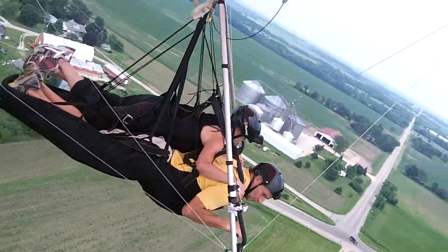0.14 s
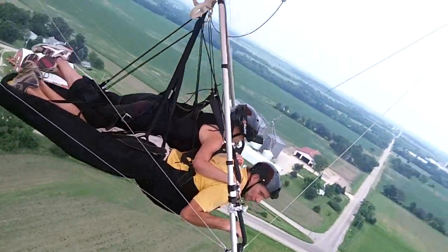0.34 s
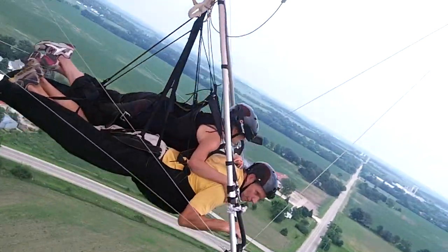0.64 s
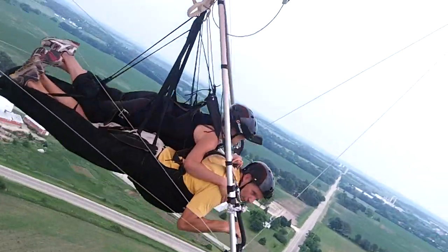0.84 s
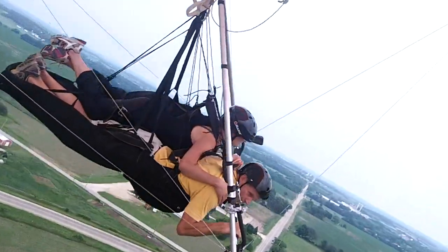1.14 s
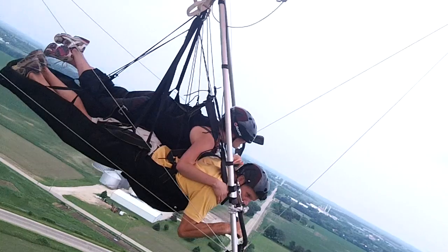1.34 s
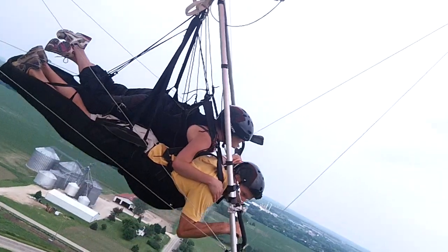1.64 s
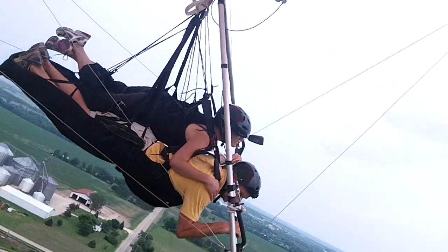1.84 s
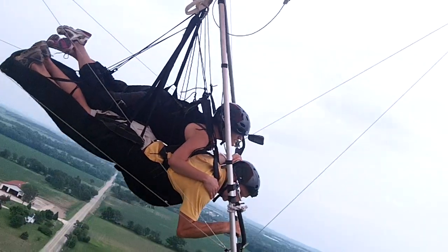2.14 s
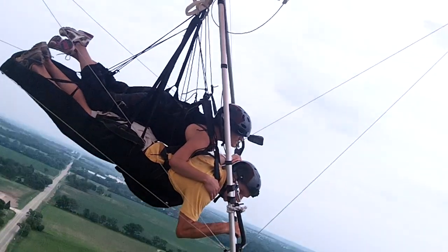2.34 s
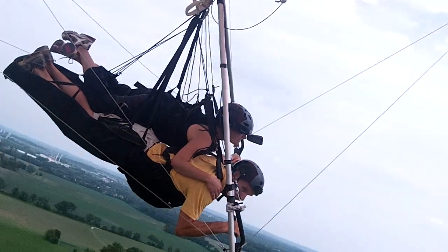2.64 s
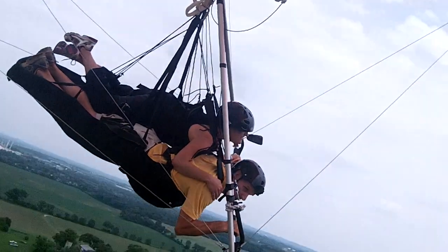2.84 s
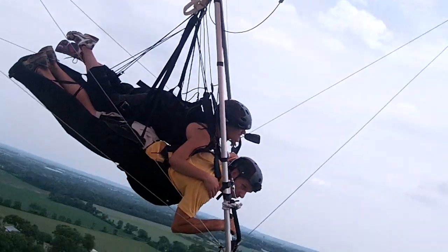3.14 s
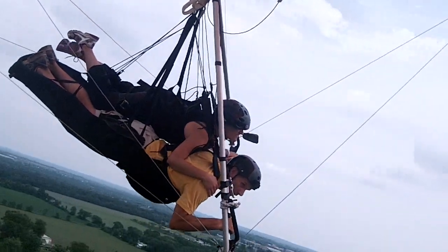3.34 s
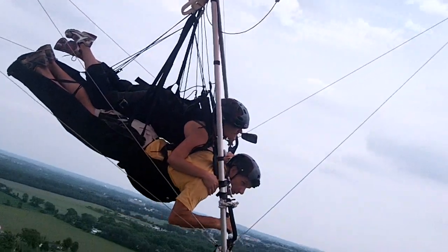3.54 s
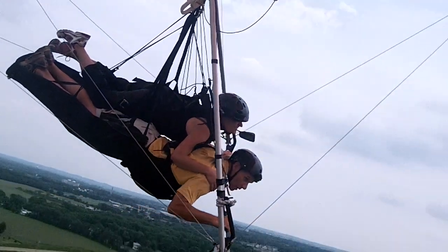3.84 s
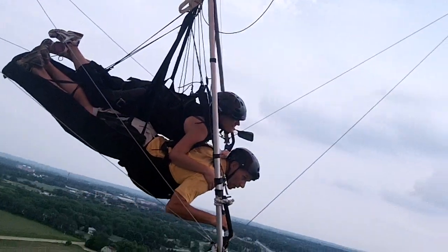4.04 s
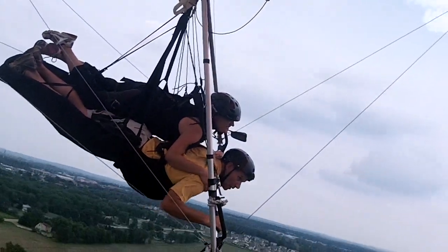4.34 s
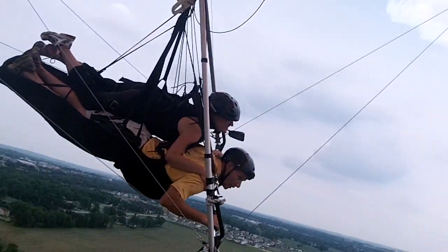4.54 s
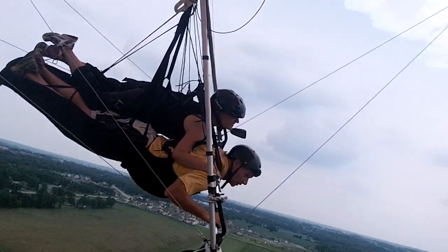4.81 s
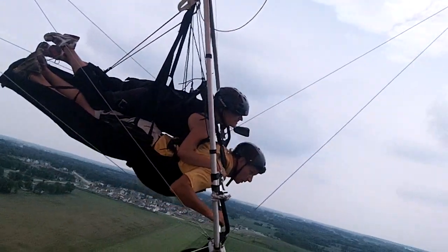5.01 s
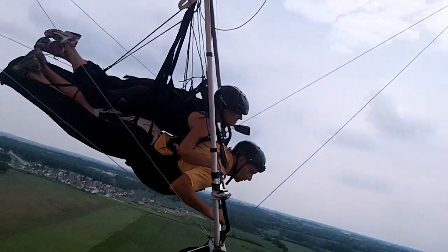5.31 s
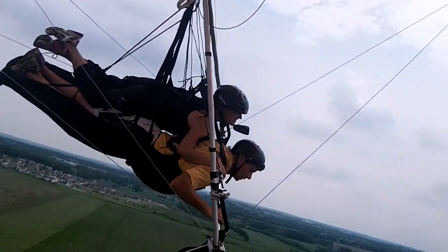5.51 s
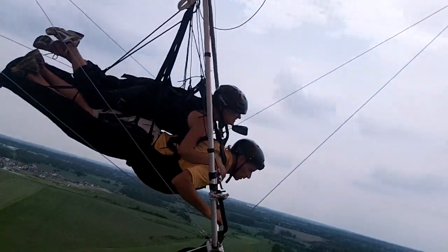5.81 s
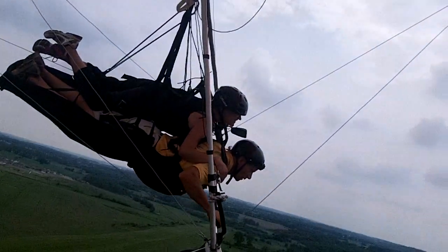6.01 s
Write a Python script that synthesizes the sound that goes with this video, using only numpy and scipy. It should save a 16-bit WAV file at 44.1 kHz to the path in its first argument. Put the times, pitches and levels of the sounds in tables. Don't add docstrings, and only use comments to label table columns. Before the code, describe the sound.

Continuous close wind roar high in the air, gusting unevenly, its hiss fading into deep rumbling thumps and ticks, then growing airy again.

```python
import sys
import numpy as np
from scipy import signal
from scipy.fft import rfft, irfft, next_fast_len
from scipy.io import wavfile
from scipy.ndimage import uniform_filter1d, map_coordinates

SR = 44100
rng = np.random.default_rng(int(sys.argv[2]) if len(sys.argv) > 2 else 0)


def transcribe(u):
    v = np.clip(np.atleast_2d(u).T, -1, 1)
    q = np.round(v * 32767).astype(np.int16)
    wavfile.write(sys.argv[1], SR, q)


def elevation(decibels):
    levels = np.asarray(decibels, float)
    return 10 ** (levels / 20)


N = 272097
TIME = np.arange(N) / SR


def unit(x):
    return x / np.sqrt(np.mean(x ** 2))


def noise():
    return rng.standard_normal(N)


def colour(x, points):
    size = next_fast_len(N)
    hz, db = np.transpose(points)
    bins_hz = np.arange(size // 2 + 1) * SR / size
    shape_db = np.interp(np.log(bins_hz + 1), np.log(hz), db, -120, -120)
    return unit(irfft(rfft(x, size) * elevation(shape_db), size)[:N])


def walk(rate):
    levels = rng.standard_normal(N // 32)
    return unit(map_coordinates(levels, [TIME * rate], order=3))


def evened(x, share, size):
    power = uniform_filter1d(x ** 2, size=size)
    return unit(x / (power + 0.06) ** (share / 2))


def curves(table):
    s, *columns = np.transpose(table)
    return [np.interp(TIME, s, c) for c in columns]


def bumps(s, half_s, db):
    coarse = TIME[::32]
    bells = np.exp(-((coarse - s[:, None]) / half_s[:, None]) ** 2)
    return np.interp(TIME, coarse, db @ bells)


# [t/s, strength level/dB, slowness level/dB]
LARGE_EDDIES = [(0, -29, 1.5), (.8, -29.5, -5), (1.2, -34, -5), (1.55, -30.5, -1.5), (1.7, -26, -4),
                (2.1, -21, -5), (2.5, -27.5, -3), (2.9, -24, -3), (3.5, -25, 0), (4.2, -25, -4),
                (4.8, -25.5, -0.5), (5.3, -31.5, 6.5), (5.7, -30, 3.5), (6.17, -29.5, 8)]
# [f/Hz, level/dB]
HEAVE_SPECTRUM = [(8, -29.5), (18, -6.5), (32, -3.5), (44, -6), (58, -19)]
# [f/Hz, level/dB]
SWING_SPECTRUM = [(36, -17), (47, -2.5), (60, 2), (85, -7), (110, -24.5)]
# [f/Hz, level/dB]
FLAP_SPECTRUM = [(70, -15.5), (92, 2), (120, -2.5), (160, -6.5), (220, -14), (320, -23.5), (500, -27.5)]


def buffet():
    strength_db, slow_db = curves(LARGE_EDDIES)
    heave_db = strength_db + slow_db + 0.5 + surge_db(30)
    swing_db = strength_db + surge_db(60)
    flap_db = -30 + 0.067 * (strength_db + 29) - 0.11 * slow_db + surge_db(120)
    heave = evened(colour(noise(), HEAVE_SPECTRUM), share=0.56, size=3200)
    swings = evened(colour(noise(), SWING_SPECTRUM), share=1.0, size=2400)
    flaps = evened(colour(noise(), FLAP_SPECTRUM), share=0.3, size=1800)
    steady = elevation(heave_db) * heave + elevation(swing_db) * swings + elevation(flap_db) * flaps
    strong, reach = thumps(hz=53.3, turns=0.36, peak_db=-9.5, slope=0.68)
    return (1 - 0.39 * reach) * steady + strong


# [t/s, peak level/dB]
TICKS = [(1.75, -52), (1.7916, -50.5), (1.823, -56), (1.8881, -53.5), (1.933, -52.5), (2.063, -57),
         (2.088, -57), (2.135, -50.5), (2.2695, -58), (2.31, -57), (2.5643, -57), (2.657, -53),
         (2.7373, -56), (2.845, -57), (2.88, -51), (2.9198, -54), (3.053, -56), (3.1773, -64), (3.256, -52),
         (3.341, -54.5), (3.5114, -50), (3.595, -55.5), (3.7286, -52), (3.8502, -52), (3.8843, -51.5),
         (3.914, -57), (4.2834, -49.5), (4.4692, -54), (4.9474, -60), (5.3527, -58)]


def thumps(hz, turns, peak_db, slope):
    s, db = np.transpose(TICKS)
    chance = rng.standard_normal((len(s), 2))
    lag = TIME - s[:, None] - .003
    pitch = hz * (1 + 0.22 * chance[:, :1])
    reach = np.exp(-(lag * pitch / turns) ** 2)
    push_or_pull = np.sign(chance[:, 1])
    depth = push_or_pull * elevation(peak_db + slope * (db - db.max()))
    swings = depth @ (reach * np.cos(2 * np.pi * pitch * lag))
    return swings, reach.max(axis=0)


# [t/s, half length/s, level/dB, swing
# rate f/Hz]
SURGES = [(0.01, 0.077, -10, 30), (0.04, 0.036, -1, 60), (0.249, 0.04, -11, 60), (0.684, 0.027, -9, 115),
          (0.906, 0.034, 8.1, 60), (1.347, 0.04, 1, 30), (1.576, 0.053, -14, 60), (1.97, 0.04, 3, 30),
          (2.045, 0.036, 5.1, 115), (2.27, 0.15, -4.5, 60), (2.754, 0.08, -7.1, 30), (2.768, 0.058, 7, 60),
          (3.163, 0.028, 6, 115), (3.31, 0.04, 0.5, 30), (3.51, 0.04, 3.5, 30), (3.602, 0.045, -7, 60),
          (3.886, 0.029, 3, 60), (3.925, 0.12, -3.5, 115), (4.101, 0.053, 6.5, 60), (4.3, 0.03, 3, 30),
          (4.634, 0.055, 4, 30), (4.759, 0.033, 4.5, 60), (4.869, 0.034, -2, 115), (5.2, 0.037, -5, 60),
          (5.34, 0.035, 4, 30), (5.463, 0.035, 6, 115), (5.637, 0.022, 7, 30), (5.897, 0.04, -2, 30),
          (5.99, 0.036, -1, 60), (6.166, 0.047, -7, 30),
          (0.16, 0.033, -2, 125), (0.422, 0.05, 1, 125), (0.517, 0.03, -2, 125), (0.599, 0.03, 3, 125),
         (1.307, 0.05, -5, 125), (1.5, 0.025, -5.4, 125), (1.78, 0.05, 4, 125), (2.167, 0.026, -10, 125),
         (2.796, 0.034, -9, 125), (3.542, 0.03, -10, 125), (3.71, 0.065, 2, 125), (4.071, 0.022, 2, 125),
         (4.328, 0.026, -6, 125), (4.739, 0.027, 2, 125), (4.949, 0.066, -1, 125), (5.388, 0.02, -7, 125),
         (5.67, 0.03, -2, 125), (5.827, 0.042, -4, 125), (5.918, 0.04, 4.5, 125), (6.126, 0.025, -2.8, 125)]


def surge_db(hz):
    s, half_s, db, rate = np.array(SURGES).T
    nearness = np.exp(-(np.log2(rate / hz) / 0.44) ** 2)
    return bumps(s, half_s, db * nearness)


# [f/Hz, level/dB]
HOUSING_SPECTRUM = [(120, -16.5), (230, -0.5), (400, -1.5), (750, -2), (1180, -7.5), (1500, -15.5),
                    (3000, -42), (7000, -53)]
# [f/Hz, level/dB]
RIM_SPECTRUM = [(850, -12), (1180, -6), (1450, -0.5), (2000, 0.5), (2350, -4.5), (2800, -15), (4000, -50.5)]
# [f/Hz, level/dB]
CAVITY_SPECTRUM = [(1900, -22.5), (2350, -3.5), (2750, -0.5), (3300, -1.5), (3900, -8.5), (4400, -18.5),
                   (5000, -35)]
# [f/Hz, level/dB]
EDGE_SPECTRUM = [(3700, -8), (4500, -3), (5000, -4.5), (6000, -11), (6900, -18), (7300, -25)]


def rush():
    housing_db, rim_db, port_db, edge_db = uniform_filter1d(stream_db(), size=350, axis=1)
    stream = eddies()
    start, end = WHISTLE[:2]
    locked_db = np.interp(TIME, [start, start + .012, end - .012, end], [0, -7, -7, 0])
    housing = colour(stream + 0.71 * noise(), HOUSING_SPECTRUM)
    housing *= elevation(housing_db + locked_db + 0.46 + 0.77 * walk(25))
    rim = colour(stream + 0.43 * noise(), RIM_SPECTRUM) * elevation(rim_db - 0.36 + 0.81 * walk(30))
    cavity = colour(stream + 0.49 * noise(), CAVITY_SPECTRUM) * elevation(port_db - 0.37 + 0.88 * walk(30))
    shed = np.hypot(elevation(edge_db + 0.73), elevation(curves(LARGE_EDDIES)[0] - 47.5))
    edge = colour(stream, EDGE_SPECTRUM) * shed * elevation(0.86 * walk(30))
    return housing + rim + cavity + edge


def eddies():
    puffs_db = 0.41 * walk(22) + 0.52 * walk(70) + 1.08 * walk(240) + 2.05 * walk(800)
    specks = noise() * elevation(1.8 * rng.exponential(size=N))
    return unit(elevation(puffs_db) * specks)


# [t/s, flow over the housing level/dB, aim of the airstream at the port level/dB]
FLOW = [(0, -33.5, 2.5), (.5, -29.5, -3), (.95, -29, -4), (1.55, -27.5, -4.5), (1.635, -30.5, -5),
        (1.66, -31.5, -16.5), (1.85, -36, -12), (1.875, -35.5, -19.5), (2.14, -37, -23.5),
        (2.17, -30, -11.5), (2.48, -29, -4.5), (2.75, -38, -7.5), (3.2, -38.5, -0.5), (4.0, -44, 1.5),
        (4.8, -40, 3.5), (5.05, -35, 3), (5.6, -34.5, 2.5), (6.17, -37, 3)]
# [t/s, half length/s,
# level/dB]
GUSTS = [(0.362, 0.015, -2), (0.725, 0.06, -2.3), (0.912, 0.027, -4.2), (1.37, 0.066, -2.5),
         (1.956, 0.025, -5.5), (2.27, 0.0069, -10), (2.336, 0.015, -5.5), (2.514, 0.047, -4),
         (2.73, 0.016, 5), (2.956, 0.05, -4), (3.216, 0.018, -6.5), (3.422, 0.048, -2.4),
         (3.548, 0.032, -4.4), (3.619, 0.011, -8), (3.66, 0.043, 4.5), (3.831, 0.044, 7.5),
         (3.94, 0.038, -1.5), (3.994, 0.015, 3.5), (4.056, 0.043, 8), (4.26, 0.053, 3.5),
         (4.31, 0.011, -5.5), (4.404, 0.037, 9), (4.568, 0.055, 5.0), (4.66, 0.015, -5.5),
         (4.887, 0.025, 1), (5.142, 0.021, -5), (5.366, 0.038, -8.5), (5.466, 0.013, -3),
         (5.664, 0.02, -7.1), (6.092, 0.023, -3.5),
         (0.07, 0.012, 2.4), (0.423, 0.018, 1.4), (0.489, 0.057, -2), (0.97, 0.02, -2.7),
         (1.504, 0.017, 0.4), (1.716, 0.0096, 2), (1.899, 0.014, -9), (2.085, 0.011, 0.5),
         (2.231, 0.021, 3.5), (2.638, 0.015, 0.5), (2.682, 0.013, -4), (2.784, 0.03, -0.5),
         (3.158, 0.012, 1), (3.492, 0.011, 2.5), (3.8, 0.01, 0), (4.36, 0.012, 1.5), (4.49, 0.012, -3.5),
         (4.62, 0.011, 1), (4.804, 0.02, -1.5), (5.065, 0.03, 1.5), (5.408, 0.012, 0), (5.73, 0.016, 1)]
# [t/s, edge hiss against cavity hiss level/dB]
SHEAR = [
    (0, -12.5),
    (.5, -14),
    (1.5, -18.5),
    (1.65, -23),
    (2.3, -20.5),
    (4.0, -18.5),
    (4.8, -14),
    (6.17, -10.5),
]


def stream_db():
    flow_db, aim_db = curves(FLOW)
    flow_db = flow_db + bumps(*np.array(GUSTS).T)
    rim_db = flow_db + 0.68 * np.minimum(aim_db, 0) - 0.5
    port_db = flow_db + aim_db - 0.53
    edge_db = port_db + curves(SHEAR)[0]
    return flow_db, rim_db, port_db, edge_db


# [start t/s, end t/s, first f/Hz, last f/Hz, level/dB]
WHISTLE = (2.697, 2.745, 424, 436, -34)
# [multiple of f, level/dB]
WHISTLE_HARMONICS = [
    (1, -0.5),
    (2, -4),
    (3, -9),
    (4, -9),
]


def whistle():
    start, end, first_hz, last_hz, db = WHISTLE
    share = np.clip((TIME - start) / (end - start), 0, 1)
    hz = (first_hz + (last_hz - first_hz) * share) * (1 + 0.0071 * walk(90))
    phase = 2 * np.pi * np.cumsum(hz) / SR
    swell = np.sqrt(2 * np.sin(np.pi * share).clip(0))
    return elevation(db) * swell * sum(elevation(g) * np.sin(k * phase) for k, g in WHISTLE_HARMONICS)


# [f/Hz, level/dB]
TICK_SPECTRUM = [(2500, -6), (4000, 8.5), (7200, -2.5), (7400, -9), (8200, -20), (8400, -7.5),
                 (11600, -1.5), (11800, -28)]
# [f/Hz, level/dB]
TICK_TOP_SPECTRUM = [(11600, -36), (11900, -4), (12900, -1), (13300, -14), (14800, -15)]
# [f/Hz, level/dB]
FIZZ_SPECTRUM = [(8150, -39), (8300, 5), (11400, 2.5), (11700, -39.5)]


def overload():
    s, db = np.transpose(TICKS)
    top_db = -22 - 0.3 * np.interp(s, TIME, curves(FLOW)[1])
    tick_s = 0.0031
    widths_s = tick_s * elevation(2.3 * rng.standard_normal((len(s), 1)))
    bursts = np.exp(-((TIME - s[:, None] - tick_s) / widths_s) ** 2)
    ticks = colour(noise(), TICK_SPECTRUM) * (elevation(db - 5) @ bursts)
    tops = colour(noise(), TICK_TOP_SPECTRUM) * (elevation(db + top_db) @ bursts)
    steady = np.hypot(elevation(-81.5), elevation(stream_db()[3] - 29.5))
    grain_db = 0.8 * walk(6.8) + 1.7 * walk(45) + 2.0 * walk(220)
    fizz = colour(noise(), FIZZ_SPECTRUM) * steady * elevation(grain_db)
    return fizz + ticks + tops


def crackle(swing):
    strain = (uniform_filter1d(np.abs(swing), size=130) / 0.21) ** 1.6
    return elevation(-60 + 3.0 * walk(60)) * strain * colour(noise(), TICK_SPECTRUM)


def rippled(x):
    return x + 0.46 * np.roll(x, 59)


def scene():
    return (buffet() + rush() + whistle())[None]


def band_limit(x):
    return signal.sosfilt(signal.butter(12, 14900, fs=SR, output="sos"), x)


def record(dry):
    envelope = uniform_filter1d(np.abs(dry), size=900, axis=-1)
    held = dry / (1 + (envelope / 0.39) ** 2) ** .2
    rounded = np.tanh(0.83 * held) / 0.77
    steep = signal.ellip(10, .2, 90, 7200, fs=SR, output="sos")
    cut = signal.sosfilt(steep, rounded)
    swing = uniform_filter1d(cut[0], size=200)
    return band_limit(cut + rippled(overload() + crackle(swing)))


dry = scene()
out = record(dry)
transcribe(out)
```